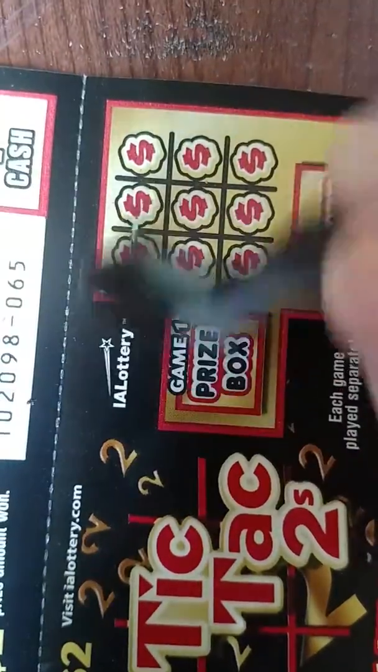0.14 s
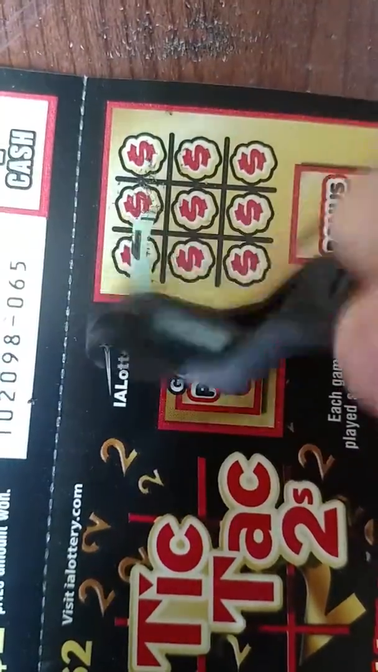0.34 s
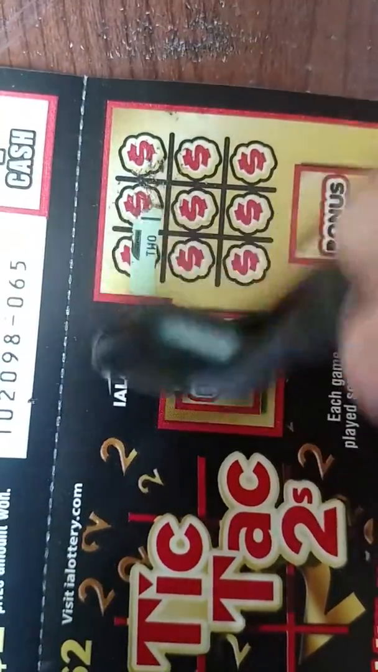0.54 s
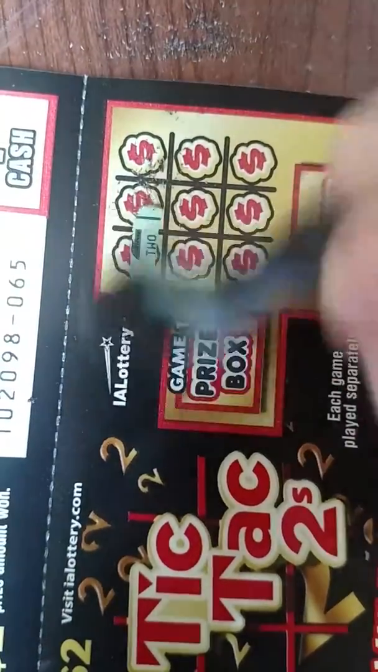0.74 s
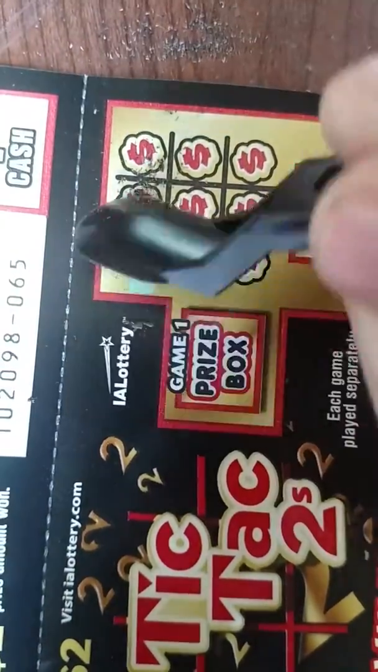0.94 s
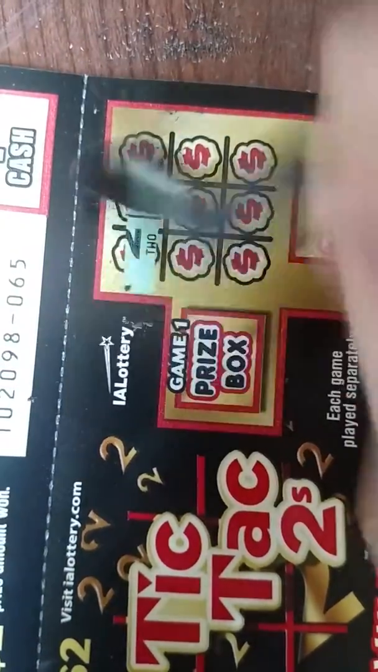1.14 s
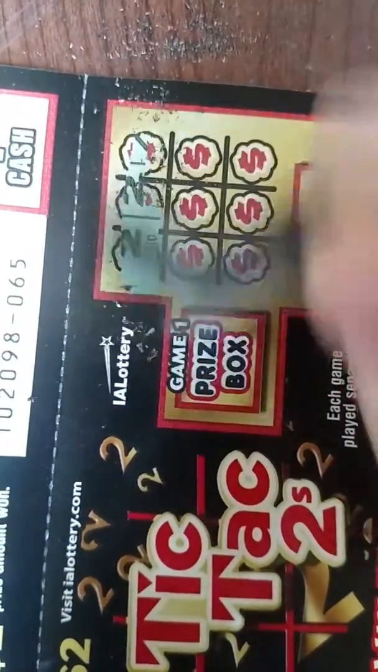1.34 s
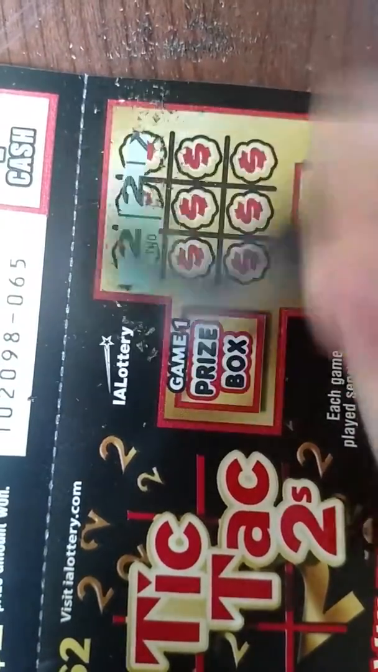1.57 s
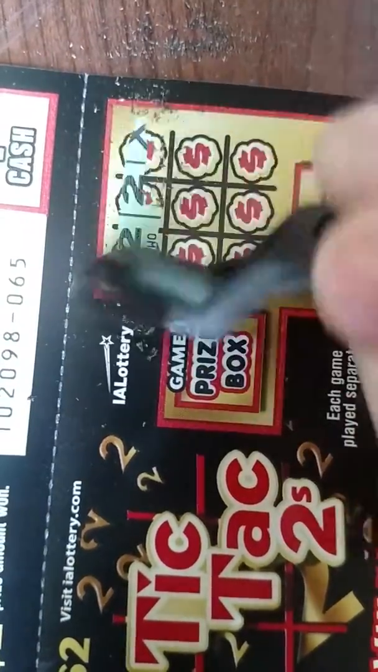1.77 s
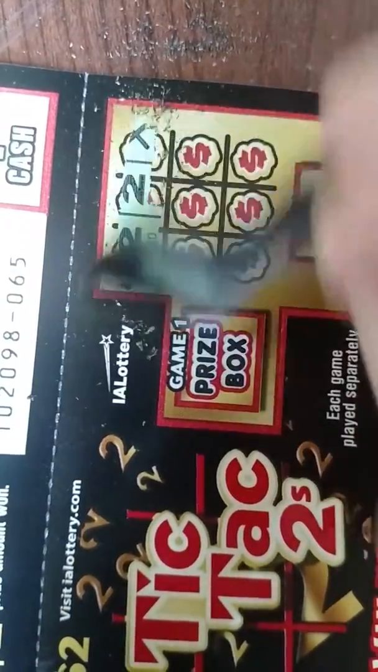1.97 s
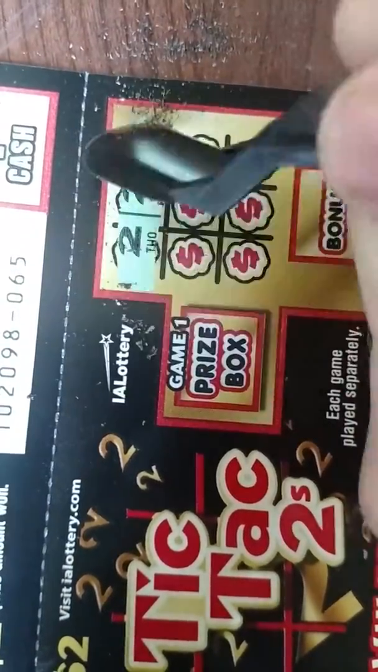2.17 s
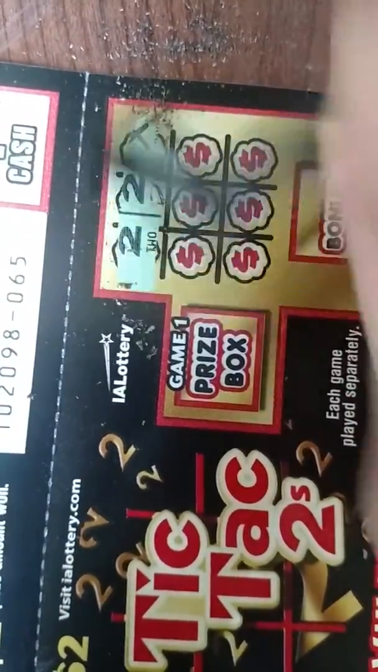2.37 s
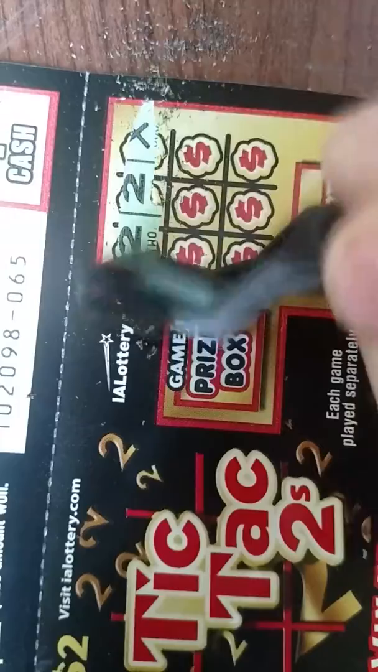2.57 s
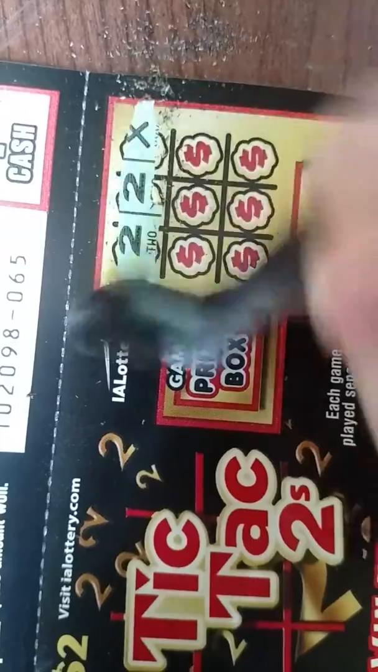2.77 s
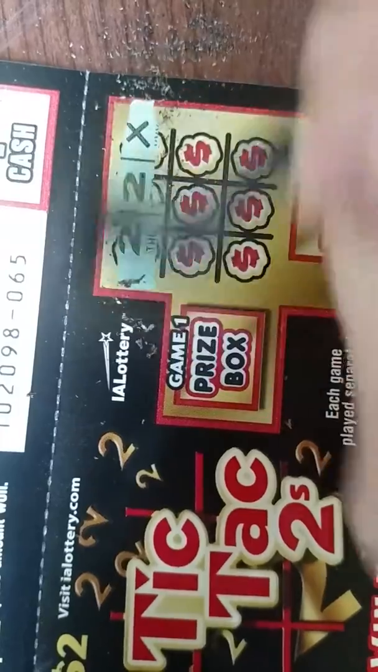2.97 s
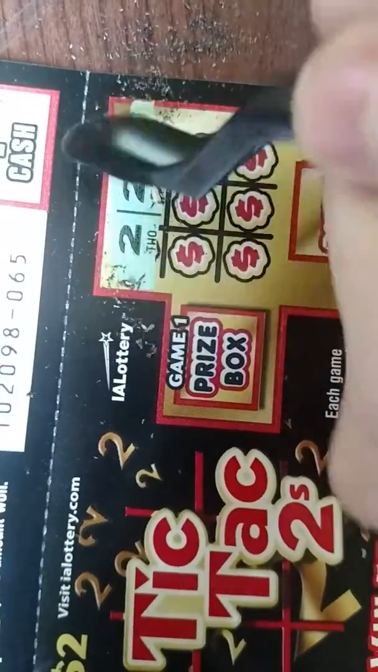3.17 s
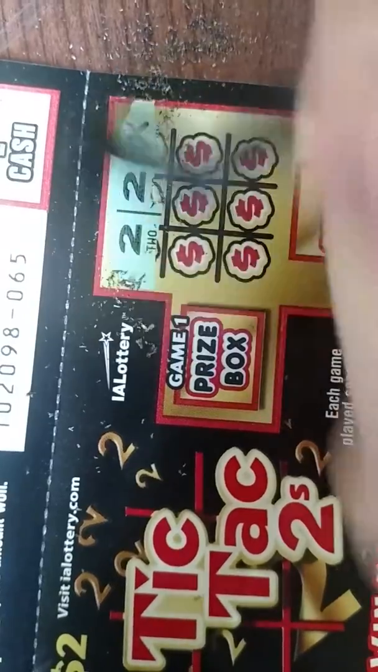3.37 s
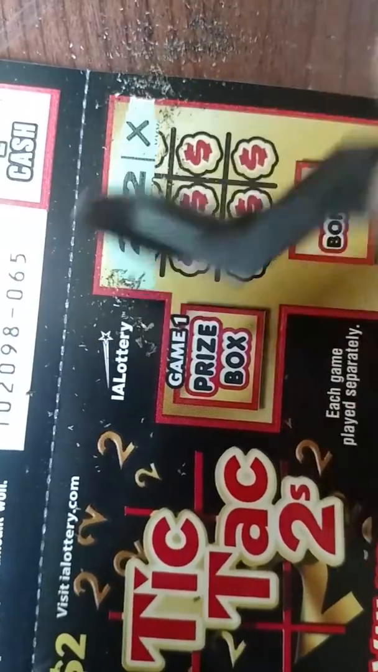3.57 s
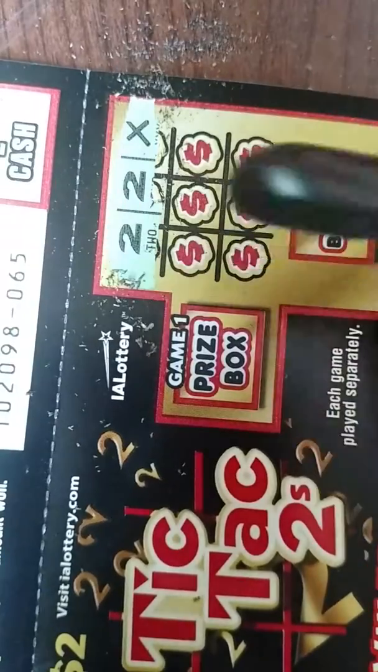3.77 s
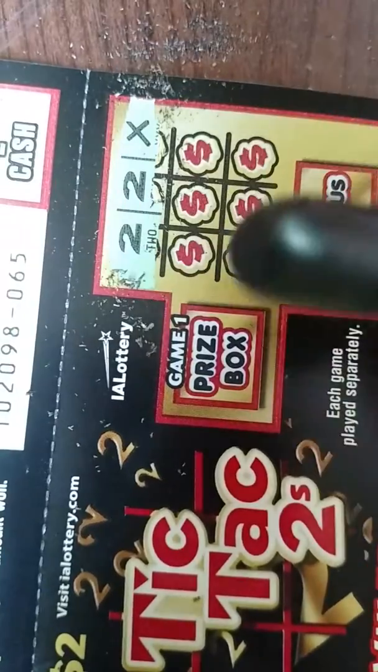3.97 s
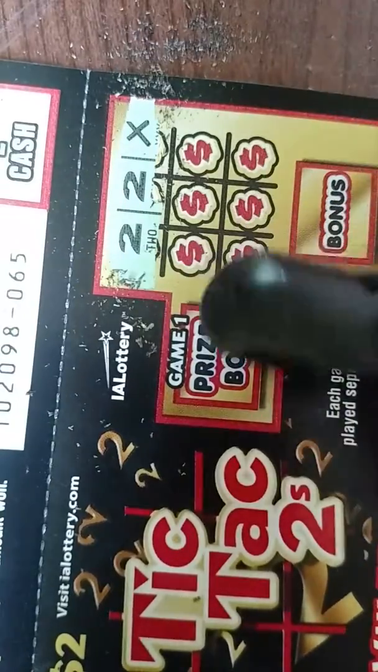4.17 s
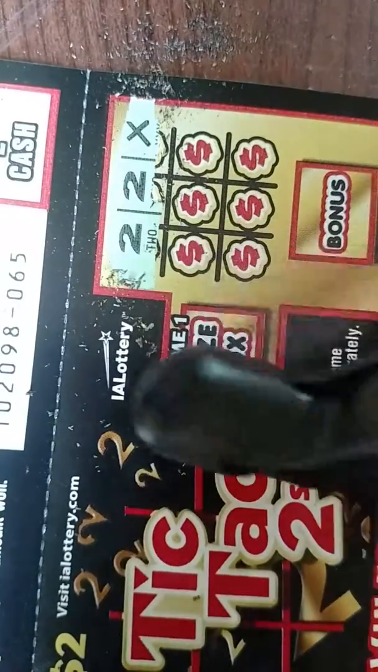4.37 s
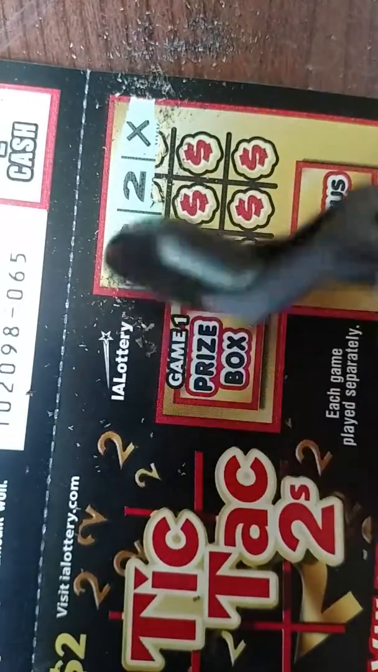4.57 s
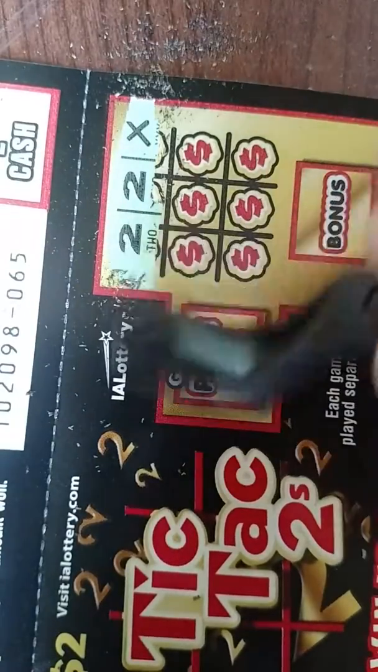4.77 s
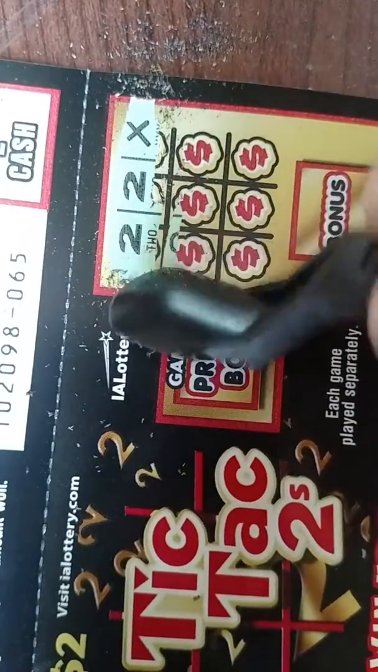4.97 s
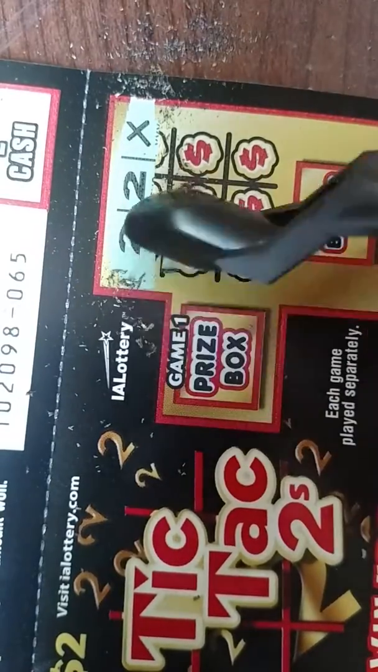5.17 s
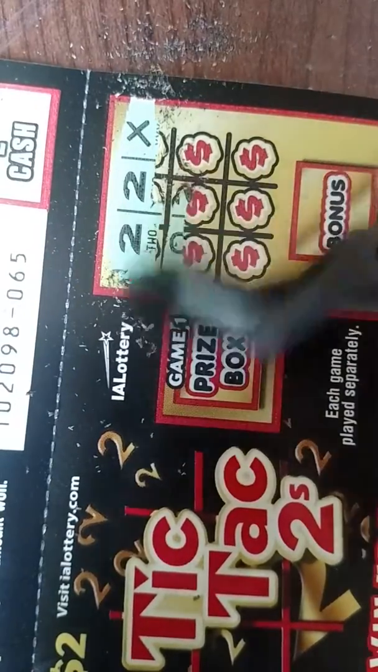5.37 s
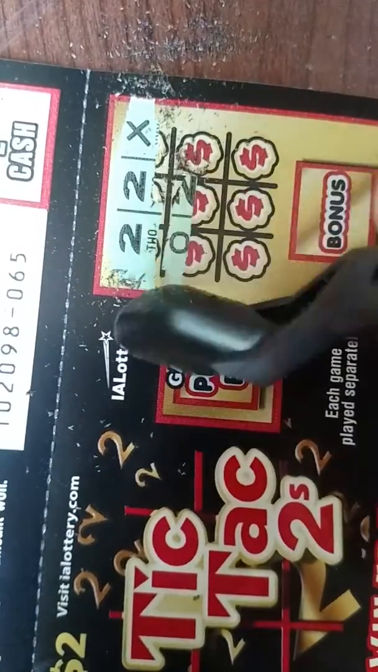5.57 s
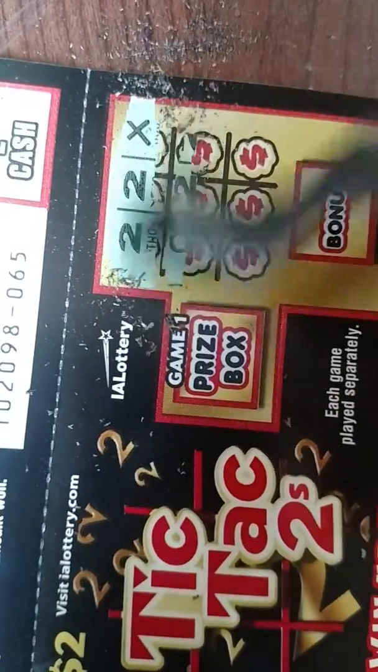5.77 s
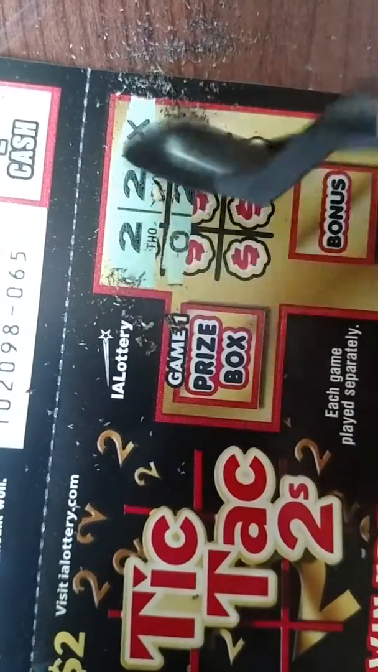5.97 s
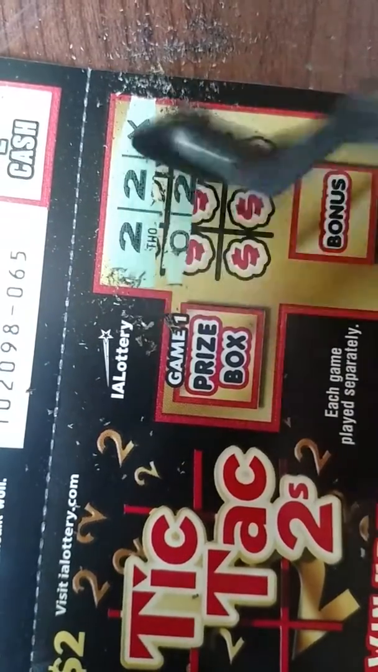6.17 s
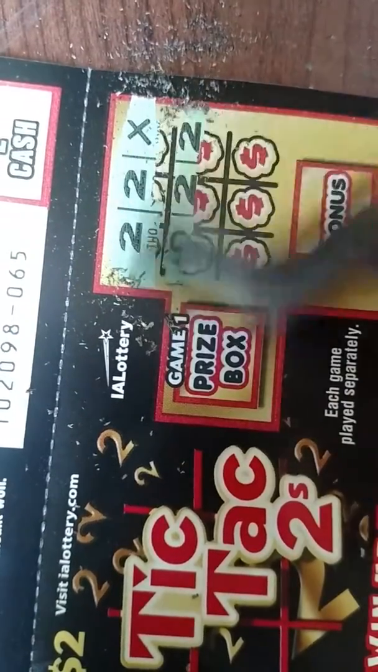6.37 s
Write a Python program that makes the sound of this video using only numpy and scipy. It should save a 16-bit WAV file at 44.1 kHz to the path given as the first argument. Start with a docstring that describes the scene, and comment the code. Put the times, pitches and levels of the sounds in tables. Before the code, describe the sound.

Fast, dry scratching on a paper ticket, each stroke a brief rasp with a low woody growl underneath and a thin fizz of breaking flakes on top. The edge sometimes catches and thumps the table. After a long first spell the hand lifts, leaving quiet room noise and slight contact sounds, then a second, similar spell begins. Close microphone, table resonance strong, hardly any room echo.

```python
"""A small flat tool scrapes the coating off a card ticket on a wooden table, about eight strokes a second
with one pause, heard close and with a strong share of the table over quiet room noise.
Stick-slip friction: dense random micro-slips under the edge excite the resonances of table, card and tool,
which rumble, rasp and hiss; breaking flakes add a bright fizz of coloured noise.
Now and then the edge catches or lands, and a short push of force makes the bodies knock."""
import sys
import numpy as np
from scipy import signal
from scipy.fft import rfft, irfft, next_fast_len
from scipy.io import wavfile
from scipy.ndimage import uniform_filter1d, map_coordinates

SR = 44100
rng = np.random.default_rng(int(sys.argv[2]) if len(sys.argv) > 2 else 0)


def persist_wave(psi):
    """Save psi, clipped to +-1, as 16-bit WAV."""
    counts = np.round(np.clip(psi, -1, 1) * 32767).astype(np.int16)
    wavfile.write(sys.argv[1], SR, np.atleast_2d(counts).T)


N = 283122


def from_db(db):
    """Level to amplitude: 20 dB for each factor of ten."""
    return 10 ** (np.asarray(db) / 20)


def rms(x):
    """Effective value: the root of the mean square."""
    return np.sqrt(np.mean(x ** 2) + 1e-20)


def butter(x, edges_hz, kind, order=2):
    """Maximally flat filtering: a causal Butterworth filter."""
    sections = signal.butter(order, edges_hz, kind, fs=SR, output="sos")
    return signal.sosfilt(sections, x + 1e-18)


def coloured(x, spectrum):
    """Spectral shaping: weight a white signal along log frequency; rms 1."""
    hz, db = np.transpose(spectrum)
    size = next_fast_len(N)
    bins_hz = np.maximum(np.fft.rfftfreq(size, 1 / SR), 1)
    gain = from_db(np.interp(np.log(bins_hz), np.log(hz), db))
    y = irfft(rfft(x, size) * gain, size)[:N]
    return y / rms(y)


def wander(per_s):
    """Slow random modulation: straight lines join random knots; spread about 1."""
    knots = rng.standard_normal(4096)
    path = map_coordinates(knots, [np.arange(N) / SR * per_s], order=1, mode="wrap")
    return path / np.sqrt(2 / 3)  # linear interpolation lowers the variance to 2/3


def slips(per_s, spread_db):
    """Stick-slip friction: tiny releases at random moments, of uneven size and either sign; rms 1."""
    sizes = from_db(spread_db * rng.standard_normal(N)) * rng.choice([-1, 1], N)
    clicks = sizes * (rng.random(N) < per_s / SR)
    return clicks / rms(clicks)


def push(hardness_hz):
    """Impact spectrum: a push of unit momentum is shorter, hence brighter, the harder the contact."""
    age = 2 * np.pi * hardness_hz * np.arange(SR // 20) / SR
    shape = age * np.exp(-age)
    return shape / shape.sum()


def body(force, modes, low_hz, high_hz, flip=False):
    """Modal superposition: parallel resonances within the radiated band; a white force keeps its rms.
    Modes in step answer at once; with flip, neighbours move against each other and need only gentle band edges."""
    click, ring = signal.unit_impulse(SR // 2), 0
    for k, (hz, width, db) in enumerate(modes):
        r = np.exp(-np.pi * width / SR)
        poles = [1, -2 * r * np.cos(2 * np.pi * hz / SR), r * r]
        sign = (-1) ** k if flip else 1
        mode = (1 - r * r) / 2 * signal.lfilter([1, 0, -1], poles, click)
        ring = ring + sign * from_db(db) * mode
    ring = butter(ring, [low_hz, high_hz], "band")
    if not flip:
        ring = butter(ring, [low_hz, high_hz], "band")
    return signal.fftconvolve(force, ring / np.sqrt(np.sum(ring ** 2)))[:N]


# spectrum of the quiet room: (frequency [Hz], relative density [dB])
ROOM_SPECTRUM = [(15, -44), (25, -5), (66, -5), (96, 3.5), (198, -1), (628, -12.5), (939, -14),
                 (1410, -19.5), (2340, -23), (2540, -23.5), (2900, -25), (3500, -27), (5100, -32),
                 (9210, -35.5), (15400, -39)]


def room():
    """Stationary noise: the quiet room is steady noise that falls towards the treble."""
    return from_db(-55.5) * coloured(rng.standard_normal(N), ROOM_SPECTRUM)


RESTING_DB, LIFT_DB_PER_S = -30, 240.5  # rubbing fades to this level when the hand lifts


def rubbing():
    """Sliding friction: the hand rubs lightly during and around each stroke, and hardly at all in the pause."""
    t, away_s = np.arange(N) / SR, np.inf
    for start, length, *_ in STROKES:
        away_s = np.minimum(away_s, np.abs(t - start - length / 2) - length / 2)
    return from_db(-LIFT_DB_PER_S * np.maximum(away_s, 0)) + from_db(RESTING_DB)


SWAY_HZ, SWAY_WIDTH_HZ, SWAY_DB = 40.14, 4.1, -51.5  # the level is for full effort


def sway(handling):
    """Forced vibration: the working hand keeps the table's lowest mode shaking."""
    edges_hz = [SWAY_HZ - SWAY_WIDTH_HZ / 2, SWAY_HZ + SWAY_WIDTH_HZ / 2]
    shake = butter(rng.standard_normal(N), edges_hz, "band")
    effort = uniform_filter1d(handling, size=SR // 5)  # too heavy to follow single strokes
    return from_db(SWAY_DB) * effort ** 0.54 * shake / rms(shake)


# strokes of the tool, with relative levels at mid-travel: (start [s], length [s],
# pressure on the table [dB], drag on the card [dB], cut through the coating [dB])
STROKES = [(0.017, 0.096, -26, -31.5, -53), (0.129, 0.094, -29.5, -26.5, -49.5),
           (0.263, 0.086, -27.5, -31.5, -57.5), (0.373, 0.084, -21, -31.5, -51),
           (0.497, 0.09, -25.5, -34.5, -63.5), (0.593, 0.1, -17.5, -34, -59.5),
           (0.736, 0.1, -33.5, -37, -60.5), (0.847, 0.095, -18, -32, -55),
           (0.981, 0.09, -25.5, -30.5, -54.5), (1.107, 0.089, -19.5, -33, -57),
           (1.209, 0.083, -22, -28, -48), (1.33, 0.093, -20.5, -32, -58.5), (1.448, 0.091, -22, -31, -53),
           (1.566, 0.1, -18, -30.5, -59.5), (1.679, 0.095, -25.5, -34.5, -63),
           (1.799, 0.088, -18, -31.5, -64), (1.947, 0.084, -28.5, -36, -65.5),
           (2.059, 0.11, -19, -32.5, -66), (2.233, 0.096, -26.5, -38.5, -68),
           (2.353, 0.092, -18.5, -30, -61.5), (2.463, 0.12, -22.5, -36, -62.5),
           (2.594, 0.09, -20.5, -32, -65.5), (2.709, 0.099, -22, -34.5, -58.5),
           (2.84, 0.095, -18.5, -29.5, -59), (2.953, 0.11, -24, -33, -52.5), (3.092, 0.086, -17, -30, -59),
           (3.218, 0.11, -26.5, -35.5, -53.5), (3.335, 0.096, -18, -27.5, -59),
           (3.457, 0.054, -29, -40, -67), (4.664, 0.1, -34, -41.5, -70),
           (4.787, 0.092, -27.5, -31.5, -57.5), (4.918, 0.088, -23, -26.5, -54.5),
           (5.091, 0.096, -26.5, -29.5, -52), (5.244, 0.085, -22, -31.5, -57),
           (5.38, 0.088, -21.5, -30, -50), (5.493, 0.11, -35.5, -33.5, -61.5),
           (5.618, 0.1, -25.5, -29, -52.5), (5.762, 0.064, -32, -30.5, -54.5),
           (5.88, 0.09, -20, -29, -60.5), (5.998, 0.074, -27, -31.5, -53.5), (6.112, 0.1, -22.5, -30, -59),
           (6.237, 0.11, -22, -32, -54.5), (6.366, 0.066, -18.5, -28.5, -62)]
GRIP_S, RELEASE_S = 0.0045, 0.032  # the edge takes hold and lets go


def strokes(levels_db, arch_db, lean_db):
    """Contact mechanics: the force of each stroke grips fast, arches in mid-travel and eases off."""
    t, force = np.arange(N) / SR, np.zeros(N)
    for (start, length, *_), db in zip(STROKES, levels_db):
        at = slice(*np.searchsorted(t, [start, start + length]))
        age = t[at] - start
        travel = age / length - .5  # from -0.5 to 0.5
        contact = np.clip(age / GRIP_S, 0, 1) * np.clip((length - age) / RELEASE_S, 0, 1)
        force[at] += contact * from_db(db - arch_db * (2 * travel) ** 2 + lean_db * travel)
    return force


SNAGS_PER_S, SNAG_DB, SNAG_HARDNESS_HZ = 44, 22, 330  # level relative to the pressure


def snags(pressure):
    """Random impacts: small catches come by chance and grow with the pressure."""
    clicks = (rng.random(N) < SNAGS_PER_S / SR) * rng.uniform(-0.88, 1, N)
    return from_db(SNAG_DB) * signal.fftconvolve(clicks * pressure, push(SNAG_HARDNESS_HZ))[:N]


ECHO_SHARE, ECHO_LAG_S, ECHO_DRIFT_OCTAVES = 0.33, 0.001609, 0.575  # typical lag and its spread


def travelling(x):
    """Comb filtering: the ticket's border sends the vibration back with a wandering lag that shifts the colour."""
    lag = ECHO_LAG_S * SR * 2 ** (ECHO_DRIFT_OCTAVES * wander(per_s=9))
    echo = np.interp(np.arange(N) - lag, np.arange(N), x, left=0)
    return (x + ECHO_SHARE * echo) / np.hypot(1, ECHO_SHARE)


# low modes of the tabletop: (frequency [Hz], width [Hz], level [dB])
TABLE_DEEP = [(88.7, 14, -13.5), (120.1, 3.2, -5), (145.8, 6.8, 2), (165.2, 14.4, 0.8), (206.2, 19, -5.5),
              (226, 14, -7.5), (263.2, 12.2, -4)]
# higher modes of the tabletop: (frequency [Hz], width [Hz], level [dB])
TABLE_UPPER = [(316.2, 9, -7), (350, 56, -3), (390.6, 9.9, -4), (408.6, 11, -21.5), (444.2, 5.5, -4)]


def table(rumble, growl, handling, catches):
    """Plate resonance: the tabletop rumbles and growls under coarse slips and thumps under the catches."""
    # independent forces add as powers, hence hypot
    deep = np.hypot(rumble, from_db(-36) * handling) * slips(per_s=2500, spread_db=3.5)
    upper = np.hypot(growl, from_db(-49.5) * handling) * slips(per_s=2500, spread_db=4)
    unevenness = from_db(-1.92 + 1.56 * wander(per_s=70))
    deep_ring = body(deep * unevenness + catches, TABLE_DEEP, low_hz=85, high_hz=309)
    upper_force = travelling(upper * unevenness) + catches
    return deep_ring + body(upper_force, TABLE_UPPER, low_hz=317.7, high_hz=455.3)


# low modes of the card on the wood: (frequency [Hz], width [Hz], level [dB])
CARD_LOWER = [(567.2,16.4,0.5),(596.4,25.5,1),(660,35.4,-3.5),(697,44,-2.5),(767.4,35.4,0),(879,48,-11.5),(958,11,-11.5),(1004,19,-10),(1083,23,-11.5)]
# upper modes of the card: (frequency [Hz], width [Hz], level [dB])
CARD_UPPER = [(1187,49,2.5),(1283,107,-4.5),(1522,17.4,-4),(1854.5,32.2,-4)]


def card(rasp, cut, handling, catches, lead_s=0.0021):
    """Modal excitation: the card rasps with the drag, and its upper modes wake as the edge cuts deeper."""
    t = np.arange(N) / SR
    early_rasp = np.interp(t + lead_s, t, rasp)  # the force leads the ringing that it builds
    drag = np.hypot(early_rasp, from_db(-51) * handling)
    bite = np.hypot(from_db(-4) * rasp ** 0.5 * cut ** 0.42, from_db(-71) * handling)
    grain = slips(per_s=6000, spread_db=4) * from_db(-0.3 + 1.3 * wander(per_s=140))
    lower_force = travelling(drag * grain) + from_db(-0.5) * catches
    upper_force = travelling(bite * grain) + from_db(-3) * catches
    return (body(lower_force, CARD_LOWER, low_hz=562, high_hz=1180, flip=True)
            + body(upper_force, CARD_UPPER, low_hz=1165, high_hz=2200, flip=True))


# modes of the tool: (frequency [Hz], width [Hz], level [dB])
TOOL_MODES = [(2283, 39, -5.5), (2503, 25, -6), (2930, 25, -11.5), (2920, 200, -6), (3195, 39, -5.5),
              (3307, 26, -1), (3464, 160, -6.5), (3600, 120, -14), (3876, 29, -2.7), (4400, 330, -12.5),
              (5100, 150, -8), (5450, 140, -10), (6691, 800, -20)]


def tool(cut, handling, catches):
    """Friction-driven resonance: the edge cuts the coating and the tool rings with fine, even grains."""
    grain = slips(per_s=14000, spread_db=2.5) * from_db(1.2 * wander(per_s=300))
    rub = np.hypot(from_db(1.27) * cut, from_db(-84) * handling) * grain
    return body(rub + catches, TOOL_MODES, low_hz=2010, high_hz=6000)


# spectrum of flakes breaking off: (frequency [Hz], relative density [dB])
FLAKE_SPECTRUM = [(3000,-21),(4600,-4.5),(5200,0.5),(5750,1),(6050,-12.5),(6800,-5),(7500,-3.5),(8200,2.5),(9000,-9.5),(10100,-2.5),(11500,-14),(15500,-16)]


def flakes(cut):
    """Brittle fracture: fresh coating breaks off with a bright fizz that grows a little faster than the cut."""
    grains = slips(per_s=8000, spread_db=4)
    return from_db(-55.5) * (cut / from_db(-44)) ** 1.37 * coloured(grains, FLAKE_SPECTRUM)


# the edge digs into fresh coating and tears off a patch: (time [s], level [dB])
TEARS = [(0.177,-55),(0.415,-55.5),(0.906,-56.5),(1.161,-50),(1.845,-49),(2.105,-51.5),(2.422,-54.5),(2.749,-54.5),(3.006,-56),(3.266,-51),(5.425,-53),(5.676,-50),(5.94,-58.5),(6.185,-53.5),(6.408,-45.5)]
TEAR_HALF_S = 0.011  # from the peak to the 0.61 point


def tears():
    """Transient fracture: each torn patch swells the cut briefly in a bell curve."""
    t, swell = np.arange(N) / SR, np.zeros(N)
    for s, db in TEARS:
        distance = np.minimum(np.abs(t - s) / TEAR_HALF_S, 10)
        swell += from_db(db) * np.exp(-.5 * distance ** 2)
    return swell


# the edge catches or lands: (time [s], level [dB], hardness [Hz])
KNOCKS = [(0.417,9.5,170),(0.57,10,146),(0.66,17,155),(0.796,9.5,258),(1.155,13.5,241),(1.635,12,290),(1.838,4.5,320),(2.106,9.5,240),(2.415,8.5,300),(3.1,2.5,308),(3.381,6.5,310),(3.655,-1,425),(3.688,-9.5,220),(4.065,-3.5,166),(4.144,-18,420),(4.496,-15,240),(4.657,-1,260),(4.837,-1,180),(4.979,5,374),(5.301,14,150),(5.574,4.5,450),(5.623,6.5,302),(5.938,10.5,295),(6.177,6.5,337)]


def knocks():
    """Impact excitation: big catches and landings each give a short push of force."""
    force = np.zeros(N)
    for s, db, hardness_hz in KNOCKS:
        start = int(s * SR)
        blow = from_db(db) * push(hardness_hz)[:N - start]
        force[start:start + len(blow)] += blow
    return force


# a dull bump on the table, probably the hand; the level is before its rise and decay
BUMP_S, BUMP_DB, BUMP_HZ, BUMP_T60_S = 5.803, -15, 91, 0.11


def bump(rise_s=0.0065):
    """Damped oscillation: a soft blow is a low note that swells and dies within a few cycles."""
    age = np.maximum(np.arange(N) / SR - BUMP_S, 0)
    decay = from_db(BUMP_DB - 60 * np.minimum(age / BUMP_T60_S, 10))
    return decay * (1 - np.exp(-age / rise_s)) * np.sin(2 * np.pi * BUMP_HZ * age)


def scene():
    """Superposition: pressure drives the table, drag the card, the cut tool and flakes, over room noise."""
    _, _, pressure_db, drag_db, cut_db = np.transpose(STROKES)
    pressure = strokes(pressure_db, arch_db=1, lean_db=4.5)  # grows towards the end of a stroke
    rasp = from_db(-1.5) * strokes(drag_db, arch_db=2, lean_db=0.5)  # nearly even
    steady_cut = from_db(-4) * strokes(cut_db, arch_db=7, lean_db=0.5)  # arches most
    cut = np.hypot(steady_cut, tears())
    rumble = from_db(-5.5) * pressure
    growl = from_db(-1) * pressure ** 0.77 * rasp ** 0.26
    handling, blows = rubbing(), knocks()
    catches = blows + snags(pressure)
    wood = table(rumble, growl, handling, catches) + sway(handling) + bump()
    scrape = card(rasp, cut, handling, catches) + tool(cut, handling, blows) + flakes(cut)
    return (wood + scrape + room())[None]


def record(dry):
    """Band limitation: a steep elliptic low-pass cuts the top above 15.5 kHz."""
    return signal.sosfilt(signal.ellip(10, .1, 80, 15500, fs=SR, output="sos"), dry)


dry = scene()
out = record(dry)
persist_wave(out)
```